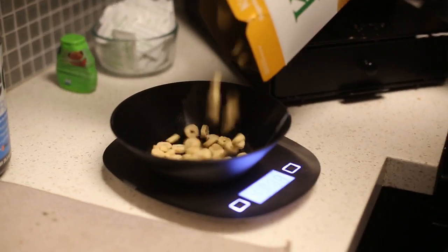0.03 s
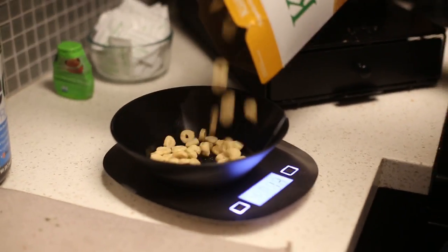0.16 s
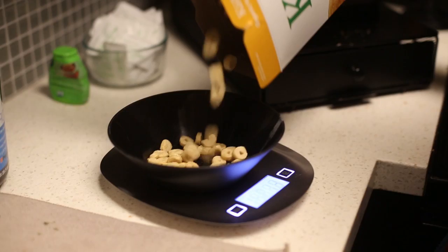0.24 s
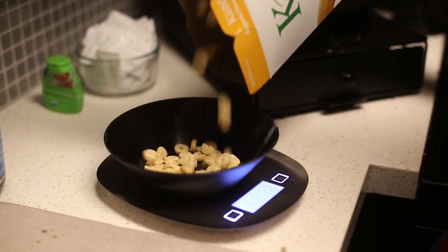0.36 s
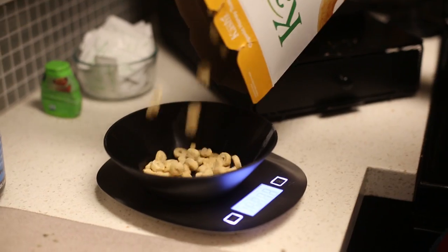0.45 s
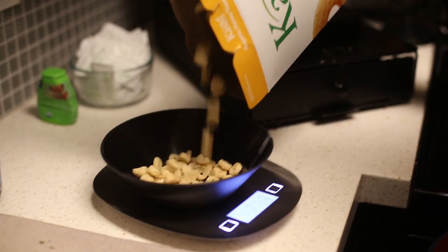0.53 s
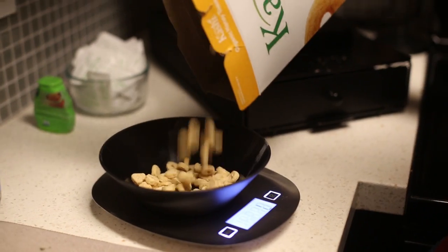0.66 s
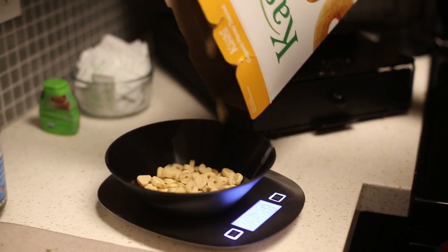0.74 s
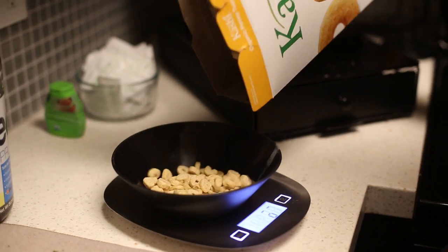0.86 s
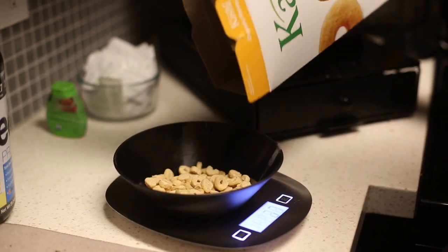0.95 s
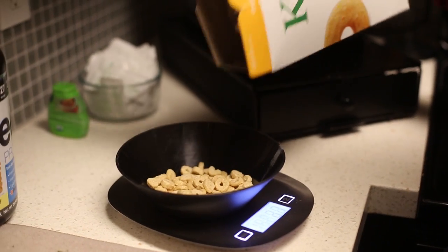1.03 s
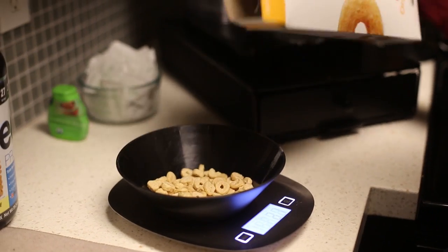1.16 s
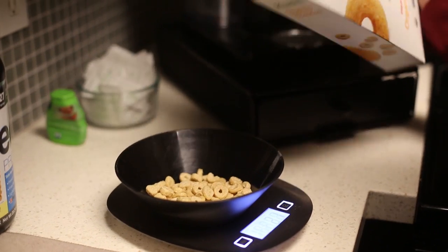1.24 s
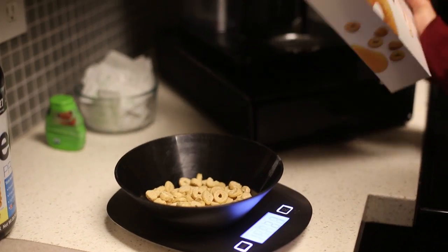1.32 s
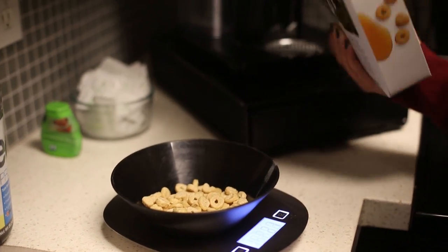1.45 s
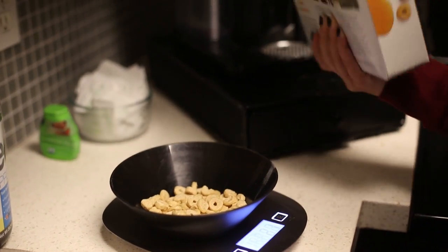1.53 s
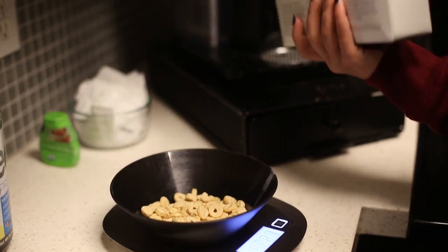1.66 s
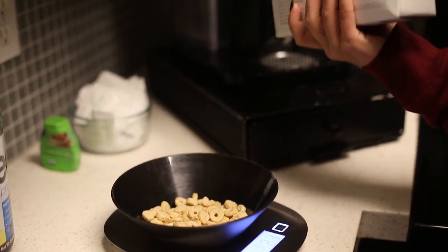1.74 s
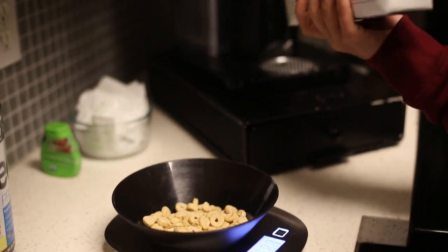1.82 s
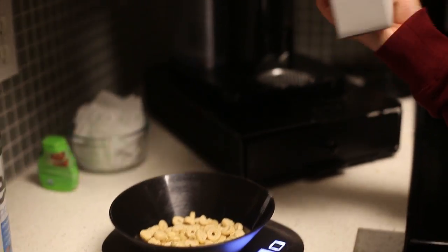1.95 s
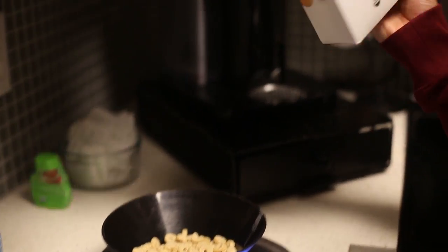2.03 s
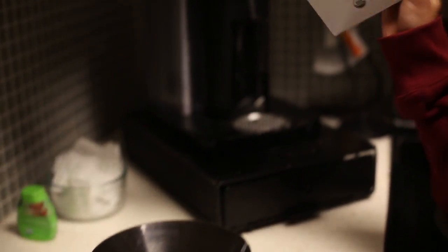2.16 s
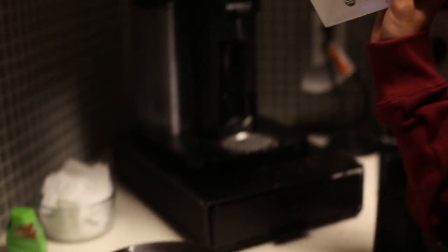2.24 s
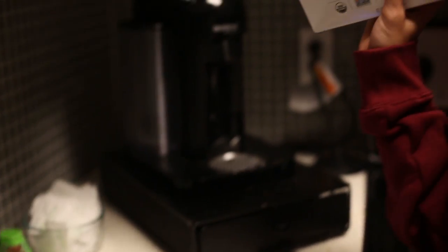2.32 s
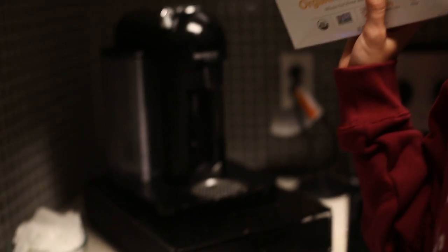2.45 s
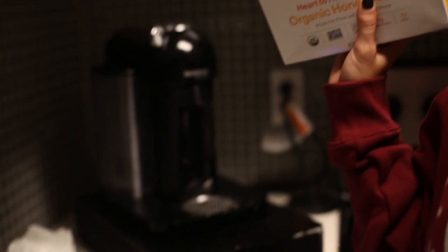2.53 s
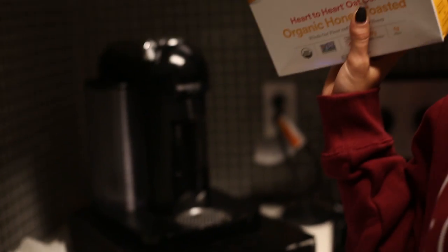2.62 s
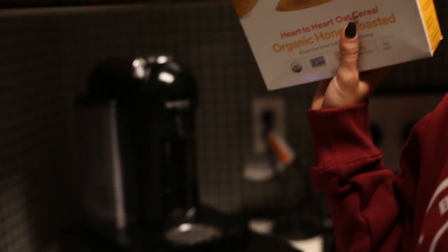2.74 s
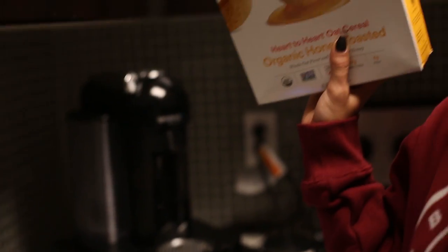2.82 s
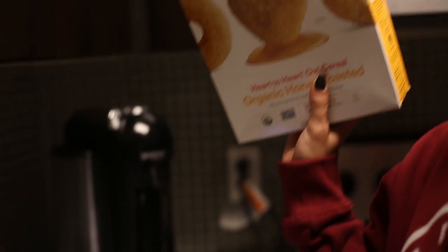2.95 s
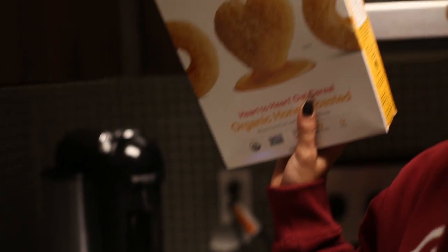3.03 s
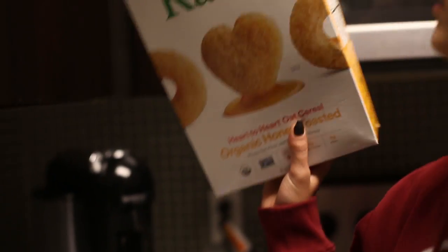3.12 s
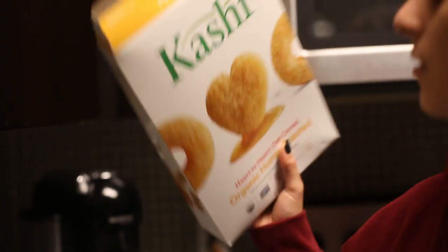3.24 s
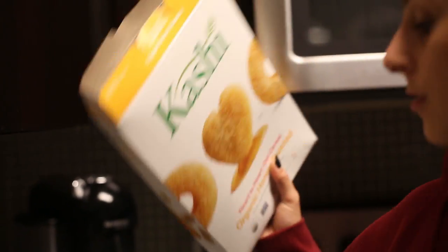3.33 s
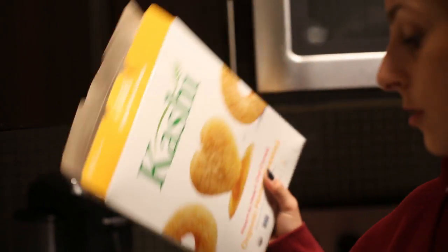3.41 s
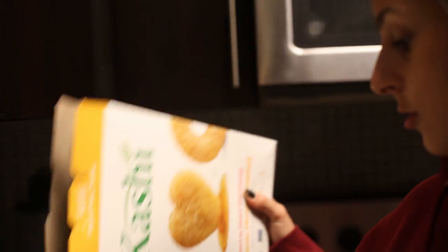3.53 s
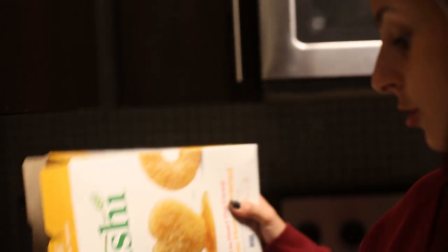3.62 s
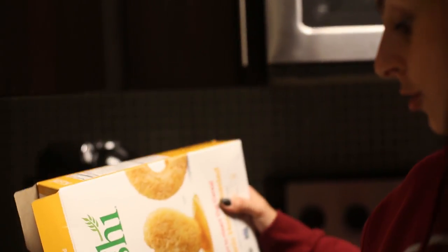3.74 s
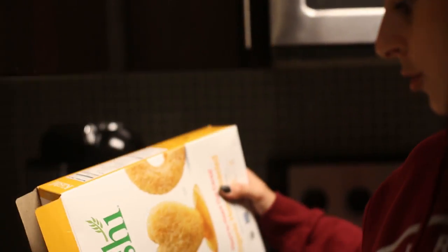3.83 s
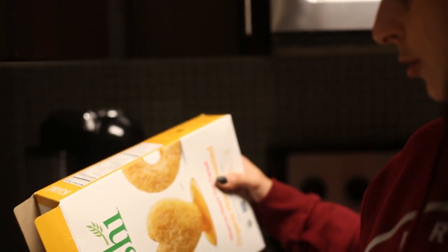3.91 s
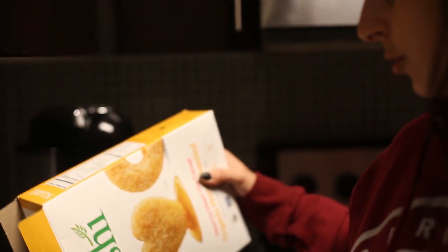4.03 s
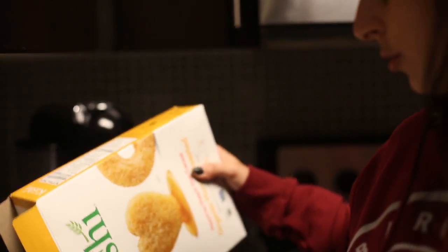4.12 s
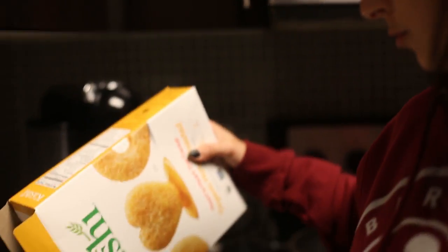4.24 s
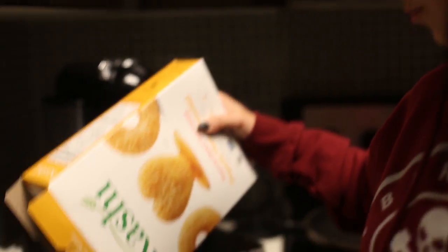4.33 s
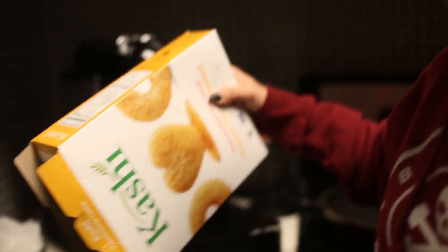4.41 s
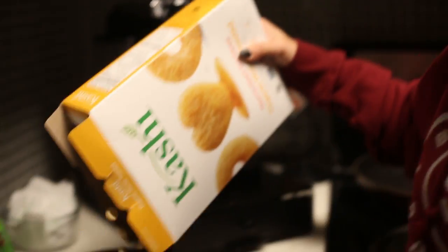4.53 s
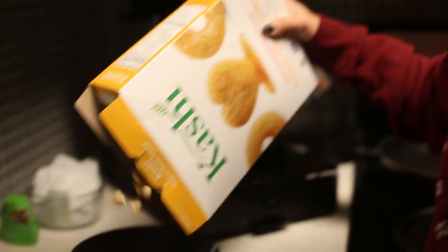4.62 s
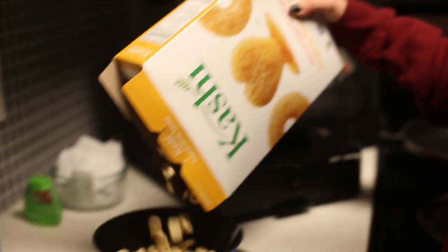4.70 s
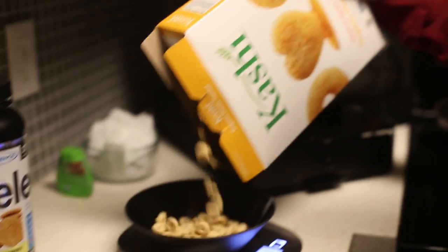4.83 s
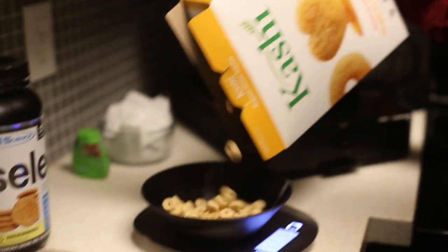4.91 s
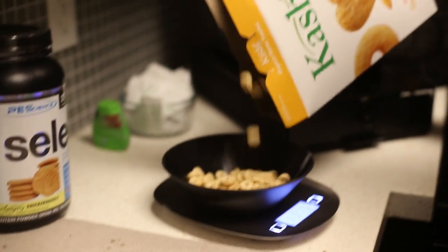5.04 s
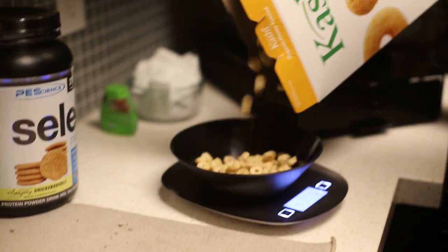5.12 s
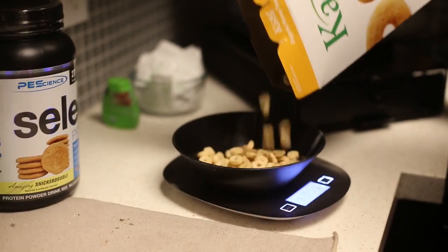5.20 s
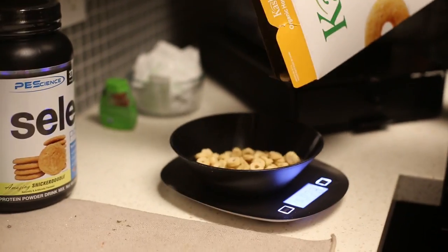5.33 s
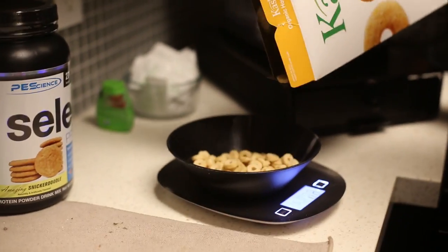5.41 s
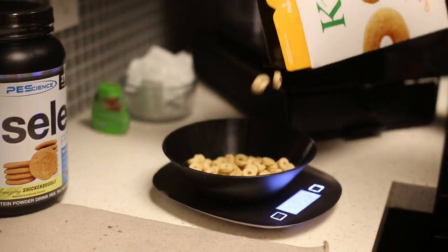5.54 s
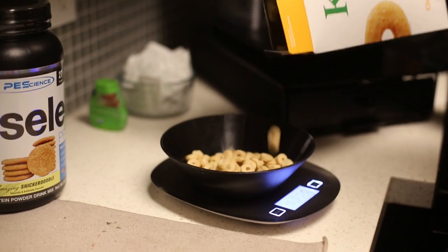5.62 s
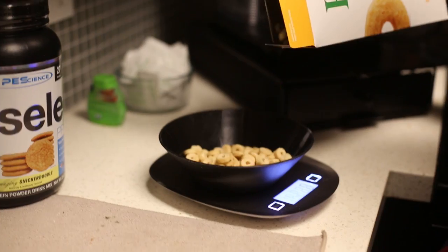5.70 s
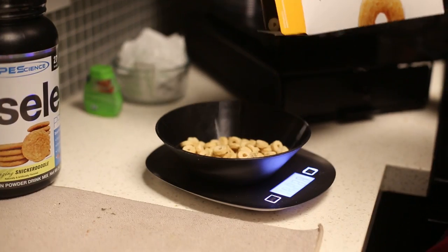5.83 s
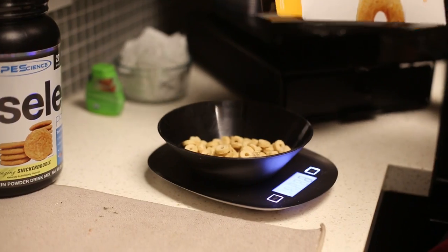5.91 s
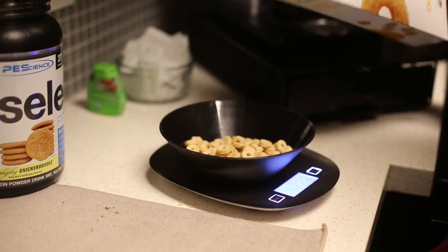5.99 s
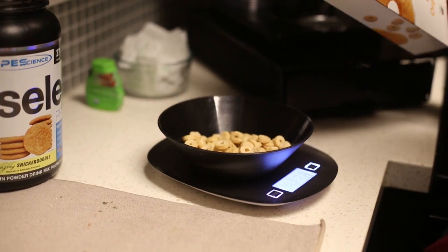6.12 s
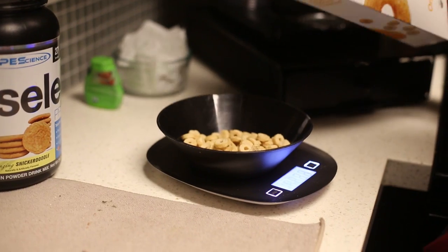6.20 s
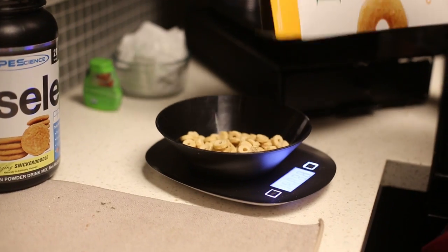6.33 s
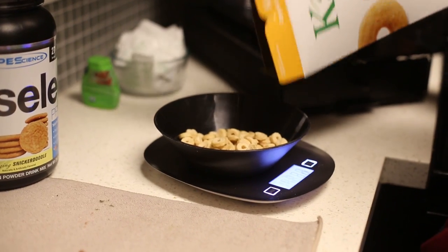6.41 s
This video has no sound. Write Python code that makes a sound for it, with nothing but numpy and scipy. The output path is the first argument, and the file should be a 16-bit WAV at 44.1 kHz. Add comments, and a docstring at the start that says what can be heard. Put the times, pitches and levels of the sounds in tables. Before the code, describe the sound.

Close pickup in a small, slightly live kitchen: a lively patter of hard cereal pieces hits a plastic bowl, then fades. Cereal thumps and shuffles inside the cardboard box, its inner bag rustling. After a quiet gap with one bright tick, another shake and crinkle lead to a sparser, softer pour that dwindles into single taps and box shuffles. A faint appliance hum and room rumble continue underneath.

```python
"""Cereal poured in a kitchen

Dry cereal pours twice from a cardboard box into a plastic bowl on a kitchen counter: ringing modes and clicks.
Between pours it slides and rattles in the tilting box: random grains drum resonant walls and a hollow body.
The liner bag rustles as filtered grains and whistles briefly; a lone bright snap bounces in the quiet.
An appliance hums as wavering tones in the small kitchen, whose walls answer with a decaying noise tail.
The microphone pickup is nearly mono, over room rumble and a soft hiss."""
import sys
import numpy as np
from scipy import signal
from scipy.fft import rfft, irfft, next_fast_len
from scipy.io import wavfile
from scipy.ndimage import uniform_filter1d, map_coordinates

SR = 44100
rng = np.random.default_rng(int(sys.argv[2]) if len(sys.argv) > 2 else 0)


def transcribe(signal):
    """Save signal, clipped to [-1, 1], as a 16-bit WAV file at the path in sys.argv[1]."""
    frames = np.atleast_2d(signal).T
    limited = np.clip(frames, -1, 1)
    pcm = np.round(limited * 32767).astype(np.int16)
    wavfile.write(sys.argv[1], SR, pcm)


def amplitude_ratio(level_db):
    """Convert a level in decibels to the matching linear amplitude (field) ratio."""
    exponent = np.asarray(level_db, float) / 20
    return 10 ** exponent


N = 284886  # samples

# Appliance tones, before they waver: pitch_hz, rms_db
HUM_TONES = [(117.2, -51.5), (228, -67.5), (327, -67), (64, -76)]
# Spectral shape of kitchen rumble and hiss: freq_hz, relative_density_db
AIR_SHAPE = [(12, -49), (30, -12), (60, 3.5), (90, 8), (150, -5.5), (300, -11), (550, -12), (1300, -29),
             (4000, -37.5), (8000, -32), (16000, -31)]
# How fast the room dies away: freq_hz, t60_s
ROOM_DECAY = [(200, 0.62), (1500, 0.53), (3000, 0.4), (3800, 0.47), (4600, 0.41), (12000, 0.15)]

# Thin whistles as the liner bag slips: start_s, length_s, pitch_hz, rms_db
BAG_SQUEAKS = [(3.645, .045, 4900, -64), (3.686, 0.07, 3840, -58), (3.7, .035, 7350, -64)]
# Colour of the rustling grains: freq_hz, relative_gain_db
RUSTLE_SHAPE = [(2060, -52), (3500, 1.5), (3750, -10), (4160, -8), (5530, -7), (11000, -15), (16000, -21)]
# The liner bag rustling: time_s, level_db
LINER_LEVEL = [(0.0, -63), (1.11, -80), (1.39, -64), (1.6, -52), (1.67, -46.5), (1.82, -59), (2.16, -64.5),
               (2.32, -65.5), (2.53, -72.5), (3.15, -75), (3.69, -64), (3.82, -43), (3.94, -55.5),
               (4.19, -62.5), (4.39, -67), (4.57, -69), (5.3, -76), (5.76, -65), (6.12, -82), (6.46, -79)]
# Cereal sliding along the box walls: time_s, level_db
SLIDE_LEVEL = [(0.0, -50), (0.43, -46.5), (0.88, -56.5), (1.1, -67.5), (1.37, -52.5), (1.52, -40),
               (1.65, -31.5), (1.76, -39), (1.97, -52), (2.2, -44.5), (2.43, -66), (3.11, -67.5),
               (3.33, -56.5), (3.52, -60), (3.69, -47), (3.8, -36), (3.92, -42), (4.06, -46.5),
               (4.19, -50.5), (4.3, -52), (4.6, -42.5), (5.11, -53), (5.5, -57.5), (5.78, -45),
               (5.95, -56.5), (6.1, -51), (6.46, -59.5)]
# The box is jolted and its load shifts: peak_s, boom_db, walls_over_boom_db
JOLTS = [(0.0, -37.5, 1.5), (0.161, -43, -3), (0.299, -40.5, -12), (0.609, -47, -4), (0.839, -52.5, -10),
         (1.401, -45.5, -5), (1.53, -47, -17), (2.09, -59, 11.5), (2.21, -52.5, -7), (3.49, -57, -16),
         (3.8, -51.5, -8), (4.08, -56, -7), (4.439, -45, -20), (4.62, -63, -2), (4.679, -48, 7),
         (4.82, -45, 2), (5.202, -46, -10), (5.428, -58, -11), (5.52, -46, 1), (5.589, -47, 7),
         (5.9, -58.5, 15), (6.091, -60, 2)]
# Resonances of the cardboard walls: centre_hz, width_hz, relative_gain_db
WALL_MODES = [(525, 460, -15.5), (661, 121, 0.5), (808, 124, -1), (1040, 300, -1.5), (1524, 510, -6),
              (2500, 510, -11), (3700, 840, -14.5)]
# Resonances of the hollow box body: centre_hz, width_hz, relative_gain_db
BODY_MODES = [(166, 50, -1), (232.7, 27.4, 3), (343.5, 84, -1)]

# Deep modes of the box walls and bowl, rung by a struck piece: pitch_hz, relative_gain_db, t60_s
DEEP_MODES = [(313, 6.5, 0.13), (536, -11, 0.033), (688, -9, 0.035), (747.5, -2.5, 0.061),
              (890, 3.5, 0.023)]
# Low modes rung by a struck piece, on the bowl's rim or the box walls: pitch_hz, relative_gain_db, t60_s
LOW_MODES = [(1104, -15, 0.18), (1120, -28, 0.0584), (1382, -12, 0.11), (1599, 1, 0.027),
             (1747, -0.5, 0.049), (2038, -6, 0.11), (2276, 0.5, 0.042)]
# High modes rung by a struck piece, on the bowl's wall or the box walls: pitch_hz, relative_gain_db, t60_s
HIGH_MODES = [(2560, -1.5, 0.1), (2790, 0, 0.062), (2940, 4.5, 0.029), (3202, -2, 0.061), (3360, -4, 0.082),
              (3593, 8.5, 0.016), (3810, -3, 0.1), (4020, 1.5, 0.03), (4506, -1, 0.089), (4865, 2.5, 0.032),
              (5370, -8, 0.11), (6315, -10.5, 0.057)]
# Colour of a dry piece's click: freq_hz, relative_gain_db
CRACK_SHAPE = [(1000, -16.5), (3000, 8), (5000, 9.5), (7000, 8.5), (11000, 1.5), (15000, -8), (17000, -39)]

# Pieces knocking inside the box: start_s, deep_peak_db, low_over_deep_db, high_over_deep_db, crack_over_deep_db
KNOCKS = [(1.345, -43.5, 5, 1, -18), (1.392, -31, -9, -7, -9), (1.443, -35.5, 1, -5, -14),
          (1.507, -37, 7, 2, -19), (1.524, -37.5, 4, 3, -19), (1.571, -30, -6, -16, -19),
          (1.621, -25.5, -12, -17, -19), (1.651, -27, -2, -6, -24), (1.666, -21, -7, -9, -27),
          (1.685, -26.5, 1, -2, -24), (1.751, -22, -10, -25, -29), (1.813, -28, -13, -0.5, 0.5),
          (1.839, -29.5, -17, -17, -21), (1.882, -35.5, -25, -13, -20), (1.962, -38.5, -17, -4, -5.5),
          (1.99, -40, -11, -2, 9), (2.026, -35, -3, -4, -12), (2.078, -27.5, -12, -26, -35),
          (2.122, -32.5, -3, -8, -29), (2.17, -33.5, -4, -12, -30), (2.209, -35.5, -9, -12, -26),
          (2.253, -37, 2, -0.5, -8), (2.284, -44, 5, 6.5, -25), (2.308, -44, -5, 5, -16),
          (3.341, -39.5, -12, -5, -24), (3.501, -46.5, -3, 8, -2), (3.775, -26.5, -7, -1, -1),
          (3.787, -32.5, 5.5, 0, 2), (3.796, -32, -8, -0.5, 7.5), (3.82, -35, 10, 5.5, -12),
          (3.827, -32, -11, 2, -16), (3.861, -33, -1, 3, 5), (3.894, -51, -12, -12, -12),
          (3.991, -48, -5, -14, -17), (4.101, -37, -2, -15, -26), (4.149, -43, 4, 3, 4),
          (4.157, -42, -5, 11.5, 12.5), (4.285, -43.5, 1, 2, -20), (4.362, -45, 12, 5, -18),
          (4.432, -56, -10, -3, -17), (4.45, -56, 2, -12, -22), (4.655, -32, 0, -10, -18),
          (5.142, -38.5, 3, -6, -11), (5.183, -32.5, 1, 3, -16), (5.514, -40.5, -7, -11, -28),
          (5.663, -37.5, 3, -10, -24), (5.694, -48, 13, -2, -17), (5.716, -36, 12, -4, -21),
          (5.773, -38, 6, -2, -12), (5.914, -56, 10, -3, -17), (6.003, -49, 6, -6, -23),
          (6.054, -42, 7, -9, -22), (6.091, -37.5, 3.5, -22, -30), (6.114, -43, 6, -12, -22)]
# A lone snap and its bounce: start_s, ring_hz, high_peak_db, low_peak_db, crack_peak_db, deep_peak_db
SNAP_HITS = [(2.7605, 3700, -19, -29.5, -34, -53.5), (2.7666, 3500, -35.5, -39, -37, -53)]
# Small pieces pattering into the bowl: time_s, level_db
POUR_LEVEL = [(0.0, -40), (0.43, -36.5), (0.66, -35), (0.86, -41), (1.02, -45.5), (1.11, -81),
              (4.39, -79.5), (4.57, -49.5), (4.71, -43.5), (4.89, -35.5), (5.09, -46.5), (5.22, -47),
              (5.4, -48), (5.56, -69), (5.88, -68), (6.12, -81), (6.46, -72)]
# Pieces landing in the bowl: start_s, ring_hz, high_peak_db, low_peak_db, crack_peak_db
LANDINGS = [(0.0008, 2790, -8.5, -15, -19.5), (0.007, 2860, -19, -19.5, -13.5),
            (0.0495, 3220, -11, -16.5, -14.5), (0.0897, 2800, -31, -22, -46), (0.0961, 3540, -10, -9, -10),
            (0.1012, 3000, -15, -29, -37), (0.1157, 2840, -15, -40, -26), (0.1272, 2860, -21, -16, -21),
            (0.1327, 3250, -18, -22, -17), (0.1378, 3460, -10, -16.5, -8.5), (0.1563, 2850, -16, -22, -18),
            (0.1672, 3340, -26, -17, -12.5), (0.1728, 3220, -7.5, -11.5, -24),
            (0.1878, 3430, -28, -25, -22), (0.213, 3610, -22, -22, -23), (0.2357, 3070, -23, -11, -5),
            (0.2437, 3110, -11, -39, -31), (0.2867, 3730, -17, -20.5, -26), (0.2924, 3050, -15, -28, -26),
            (0.303, 2900, -15, -18, -21), (0.3197, 3510, -24, -29, -23), (0.328, 3400, -8.5, -20, -13.5),
            (0.3676, 3360, -8, -9, -18.5), (0.4102, 3550, -34, -32, -30), (0.425, 3240, -15, -38, -15.5),
            (0.4364, 2830, -21, -30, -33), (0.441, 3070, -15.5, -23, -15.5), (0.471, 3350, -22, -32, -18.5),
            (0.4858, 3350, -8, -22.5, -16), (0.5075, 3600, -23, -29, -28), (0.5378, 2820, -18, -28, -23),
            (0.557, 3200, -13.5, -23.5, -18.5), (0.5963, 3310, -20, -31, -29),
            (0.6025, 3400, -15, -22, -9.5), (0.6079, 3300, -17, -43, -27),
            (0.632, 3290, -17.5, -19.5, -18.5), (0.664, 3370, -23, -38, -33),
            (0.6704, 3200, -13, -21.5, -21), (0.6822, 3150, -13.5, -38, -30), (0.7136, 3250, -19, -21, -29),
            (0.731, 3710, -17, -31, -25.5), (0.749, 2790, -18, -27, -35), (0.754, 2940, -30, -25, -18.5),
            (0.779, 3060, -30, -37, -51), (0.79, 3000, -16, -20, -19), (0.7974, 3220, -9.5, -17, -12),
            (0.8094, 3050, -25, -20.5, -25), (0.8732, 3780, -36, -35, -20),
            (0.905, 3020, -17.5, -29.5, -27), (0.9298, 3420, -25, -44, -40),
            (0.9411, 3130, -30, -51, -23.5), (0.9525, 3280, -21, -29, -46), (0.98, 3100, -37, -45, -49),
            (1.0006, 3560, -26, -39, -33.5), (1.0497, 3000, -32, -38.5, -43),
            (1.1175, 3480, -38.5, -45, -53), (1.1405, 3320, -44, -50.5, -59),
            (4.533, 3100, -21, -29.5, -27.5), (4.5513, 3660, -25, -27, -33), (4.5755, 2810, -46, -35, -32),
            (4.587, 3550, -19.5, -25, -20), (4.6271, 3030, -35, -35, -34), (4.6757, 3100, -34, -35, -31.5),
            (4.6952, 3380, -32, -25.5, -42), (4.7171, 3260, -27, -29, -29), (4.7608, 3450, -30, -38, -25.5),
            (4.767, 2900, -29, -43, -30), (4.8142, 2950, -11, -18, -21.5), (4.8216, 4430, -17, -30, -24),
            (4.8443, 3320, -25, -35, -27), (4.8524, 3600, -27, -37, -22), (4.8877, 2910, -16.5, -35, -39),
            (4.8942, 3130, -17, -30, -17), (4.9182, 2670, -22.5, -28, -32), (4.923, 3090, -27, -30, -27),
            (4.9445, 3390, -34, -38, -31), (4.9705, 3390, -28, -45, -31), (4.9766, 2690, -25.5, -31, -34),
            (4.9887, 3030, -28, -44, -40), (5.0067, 2990, -19.5, -30, -24), (5.0127, 2660, -30, -31, -41),
            (5.0277, 3070, -34, -49, -30), (5.0428, 2660, -26.5, -34, -45), (5.068, 3000, -27, -46, -28),
            (5.0867, 4600, -27.5, -32, -30), (5.137, 3810, -35, -41, -39), (5.1772, 2880, -34, -28.5, -32),
            (5.2281, 2560, -31, -19.5, -24.5), (5.234, 3700, -22.5, -33, -27),
            (5.274, 2790, -29, -24, -31.5), (5.2807, 2980, -26, -24.5, -39), (5.2992, 3120, -23, -41, -27),
            (5.3286, 3440, -19, -26, -29), (5.3358, 3430, -24.5, -30.5, -24.5),
            (5.3525, 2860, -27.5, -30, -38), (5.366, 2970, -32, -39, -31), (5.375, 3000, -28.5, -41, -38),
            (5.412, 3360, -35, -44, -48), (5.4305, 3560, -34, -39, -42), (5.4575, 2950, -17.5, -36, -23),
            (5.5665, 3480, -34, -60, -48), (5.582, 2700, -25, -22, -33.5), (5.597, 3340, -30, -39, -33),
            (5.645, 3200, -24.5, -24, -31.5), (5.742, 3780, -25, -25, -23), (5.7603, 4230, -14, -31, -29),
            (5.7672, 3730, -45, -35, -34), (5.791, 2860, -30, -29, -32), (5.8056, 3660, -29, -27, -35),
            (5.8172, 4020, -33, -28, -42), (5.8418, 3300, -36, -36, -38), (5.864, 3300, -34, -26.5, -50),
            (5.8836, 3120, -31, -25.5, -34), (5.9105, 3000, -51, -30.5, -59), (5.9313, 3100, -52, -37, -59),
            (6.0223, 2680, -41, -37, -55), (6.1592, 2590, -53, -37.5, -63), (6.3122, 2840, -29, -30, -45),
            (6.348, 2800, -60, -42, -56)]


def unit(x):
    """Scale to rms 1."""
    return x / np.sqrt(np.mean(x ** 2) + 1e-20)


def peaked(waves):
    """Scale each row to peak 1."""
    return waves / np.abs(waves).max(axis=1, keepdims=True)


def along(points, hz):
    """Read (frequency, value) points on a log frequency axis."""
    f, value = np.transpose(points)
    return np.interp(np.log(hz + 1), np.log(f + 1), value)


def curves(rows):
    """One value per sample for each column after the time."""
    s, *columns = np.transpose(rows)
    return [np.interp(np.arange(N) / SR, s, column) for column in columns]


def filtered(x, response):
    """Multiply the spectrum of x by a complex response of frequency."""
    size = next_fast_len(x.shape[-1] + 8192)
    spectrum = rfft(x, size) * response(np.fft.rfftfreq(size, 1 / SR))
    return irfft(spectrum, size)[..., :x.shape[-1]]


def resonant(x, modes):
    """Pass x through parallel broad resonances of alternating sign."""
    def response(f):
        total = 0
        for k, (centre, width, db) in enumerate(modes):
            damping = 1j * f * width
            total = total + (-1) ** k * amplitude_ratio(db) * damping / (centre * centre - f * f + damping)
        return total
    return filtered(x, response)


def wobble(rate):
    """A smooth random curve with rate knots a second, up to 40."""
    knots = rng.standard_normal(int(N * 40 / SR) + 4)
    return map_coordinates(knots, [np.arange(N) * rate / SR])


def placed(times, waves):
    """Sum rows of short waves at their start times."""
    start = np.round(np.asarray(times) * SR).astype(int)
    at = start[:, None] + np.arange(waves.shape[1])
    return np.bincount(at.ravel(), waves.ravel(), N + SR)[:N]


def grains(rate, spread_db):
    """Random impulses at rate a second, scaled to rms 1, some larger than the rest."""
    draw = rng.random((3, N))
    size = amplitude_ratio(-spread_db * np.log(draw[1] + 0.045))
    return unit((draw[0] < rate / SR) * size * np.sign(draw[2] - 0.5))


def clacks(modes, ring_hz, focus, scatter_db, rough):
    """One peak-1 ring per row: modes lose focus dB per octave from ring_hz; loose pieces roughen them."""
    hz, db, t60 = np.transpose(modes)
    t = np.arange(2048) / SR
    chance = rng.standard_normal((len(ring_hz), 2, len(hz)))
    distance = np.abs(np.log2(hz / ring_hz[:, None]))
    gain = amplitude_ratio(db - focus * distance + scatter_db * chance[:, 0])
    phase = np.pi * chance[:, 1]
    fade = amplitude_ratio(-60 * t / t60[:, None]) * (1 - np.exp(-t * hz[:, None] / 1.23))
    # the blow lasts a few ms, longer for deep modes; a weaker ring follows
    fade = fade * (0.73 + np.exp(-(t * hz[:, None] ** 0.715 / 1.5) ** 2))
    turn = 2 * np.pi * hz[:, None] * t
    ring = (gain * np.cos(phase)) @ (fade * np.sin(turn))
    ring += (gain * np.sin(phase)) @ (fade * np.cos(turn))
    chatter = uniform_filter1d(rng.standard_normal(ring.shape), size=70, axis=1)
    chatter = unit(uniform_filter1d(chatter, size=70, axis=1))
    return peaked(ring * (1 + rough * chatter))


def clicks(count):
    """Brittle noise bursts: a fast crack with a weaker tail, each brighter or duller."""
    t = np.arange(1024) / SR
    rise = 1 - np.exp(-t / 0.00013)
    fall = amplitude_ratio(-60 * t / 0.0026) + 0.18 * amplitude_ratio(-60 * t / 0.065)
    burst = rng.standard_normal((count, len(t))) * rise * fall
    tilt_db = 4.4 * rng.standard_normal((count, 1))  # per octave, between 4 and 16 kHz

    def colour(f):
        octave = np.log2(np.clip(f, 4000, 16000) / 9000)
        return amplitude_ratio(along(CRACK_SHAPE, f) + tilt_db * octave)
    return peaked(filtered(burst, colour))


def hits(s, hz, high_db, low_db, crack_db, deep_db, low_hz, deep_hz, focus):
    """Distinct pieces: each sounds a high, a low and a deep ring and a brittle click."""
    click = clicks(len(s))
    high = clacks(HIGH_MODES, hz, focus=focus, scatter_db=1.5, rough=0.58)
    each_low_hz = low_hz * 2 ** (0.1 * rng.standard_normal(len(s)))
    low = clacks(LOW_MODES, each_low_hz, focus=14, scatter_db=7.5, rough=0.7)
    deep = clacks(DEEP_MODES, deep_hz + 0 * s, focus=33, scatter_db=6, rough=0.42)
    ring = amplitude_ratio(high_db)[:, None] * high + amplitude_ratio(low_db)[:, None] * low + amplitude_ratio(deep_db)[:, None] * deep
    return placed(s, ring) + placed(s, amplitude_ratio(crack_db)[:, None] * click)


def patter(low_hz, octaves):
    """Many small bounces and rolls, each ringing somewhere in the octaves above low_hz; rms 1."""
    draw = rng.random((1000, 3))
    ring_hz = low_hz * 2 ** (octaves * draw[:, 1])
    waves = clacks(LOW_MODES + HIGH_MODES, ring_hz, focus=7.8, scatter_db=4.5, rough=0.53)
    size = amplitude_ratio(-3 * np.log(draw[:, 2:] + 0.06))
    return unit(placed(draw[:, 0] * N / SR, size * waves))


def air():
    """Steady room rumble and hiss: noise shaped in frequency, at -54 dB rms."""
    noise = rng.standard_normal(N)
    return amplitude_ratio(-54) * unit(filtered(noise, lambda f: amplitude_ratio(along(AIR_SHAPE, f))))


def hum():
    """Appliance tones that waver in strength and phase."""
    t = np.arange(N) / SR
    total = np.zeros(N)
    for hz, db in HUM_TONES:
        level = np.sqrt(2) * amplitude_ratio(db + 2.0 * wobble(4.5))
        total += level * np.sin(2 * np.pi * hz * t + 1.0 * wobble(5.6))
    return total


def kitchen(x):
    """The walls answer about 3 ms later; each frequency dies at its own speed."""
    hz, t, z = signal.stft(rng.standard_normal(SR // 2), SR, nperseg=256)
    decay = amplitude_ratio(-60 * t / along(ROOM_DECAY, hz)[:, None])
    tail = signal.istft(z * decay, SR, nperseg=256)[1]
    late = np.pad(x, (130, 0))
    return signal.fftconvolve(late, tail / np.linalg.norm(tail))[:N]


def squeaks():
    """The slipping liner bag whistles: short unsteady tones that swell and fade."""
    t = np.arange(N) / SR
    total = np.zeros(N)
    for s, length, hz, db in BAG_SQUEAKS:
        swell = np.sin(np.pi * np.clip((t - s) / length, 0, 1))
        total += 2 * amplitude_ratio(db) * swell * np.sin(2 * np.pi * hz * t + 1.7 * wobble(40))
    return total


def rustle(pour_db, liner_db):
    """Dry pieces and the liner bag tick: filtered grains follow the pour and the bag."""
    ticks = filtered(grains(2100, spread_db=2.5), lambda f: amplitude_ratio(along(RUSTLE_SHAPE, f)))
    level = amplitude_ratio(pour_db - 12) + amplitude_ratio(liner_db)
    return level * unit(amplitude_ratio(0.7 * wobble(29)) * ticks)


def cardboard(x, wall, body):
    """Blows on the box sound its walls and its hollow body."""
    once = resonant(x, WALL_MODES)
    walls = unit(once + 0.29 * resonant(once, WALL_MODES))
    return wall * walls + body * unit(resonant(x, BODY_MODES))


def slide(slide_db):
    """Cereal tumbling in clumps drums the box, harder at each jolt."""
    rise_s, fall_s = 0.0081, 0.018
    s, boom_db, wall_db = np.transpose(JOLTS)[:, :, None]
    t = np.arange(N) / SR - s
    swell = np.exp(-(t / np.where(t < 0, rise_s, fall_s)) ** 2)
    wall = amplitude_ratio(slide_db + 1.09 * wobble(14)) + (amplitude_ratio(boom_db + wall_db) * swell).sum(axis=0)
    # the hollow body grows 0.69 dB per dB of sliding
    body_db = -52.5 + 0.69 * (slide_db + 48)
    body = amplitude_ratio(body_db + 2.6 * wobble(10)) + (amplitude_ratio(boom_db) * swell).sum(axis=0)
    clumps = amplitude_ratio(1.1 * wobble(30)) * grains(800, spread_db=1.5)
    return cardboard(clumps, wall, body)


def loose_pieces(slide_db):
    """Pieces bouncing in the box: patter that grows dB for dB with the sliding."""
    return amplitude_ratio(slide_db - 11) * patter(low_hz=1120, octaves=1.74)


def knocks():
    """Pieces on cardboard: rings and clicks, duller than on the bowl."""
    s, deep_db, low_db, high_db, crack_db = np.transpose(KNOCKS)
    hz = 3350 * 2 ** (0.18 * rng.standard_normal(len(s)))
    return hits(s, hz, deep_db + high_db, deep_db + low_db, deep_db + crack_db, deep_db,
                low_hz=1330, deep_hz=598, focus=9.1)


def snap():
    """A lone bright snap and its bounce, with the high ring tightly focused."""
    return hits(*np.transpose(SNAP_HITS), low_hz=1170, deep_hz=880, focus=38)


def pouring(pour_db):
    """Small pieces pattering into the bowl: many overlapping rings."""
    return amplitude_ratio(pour_db) * patter(low_hz=1640, octaves=1.4)


def landings():
    """Pieces on the bowl: bright, with a weak deep ring that grows with the low one."""
    s, hz, high_db, low_db, crack_db = np.transpose(LANDINGS)
    # the deep ring grows 0.65 dB per dB of low ring and scatters by 6.5 dB
    deep_db = -45.5 + 0.65 * (low_db + 26.5) + 6.5 * rng.standard_normal(len(s))
    return hits(s, hz, high_db, low_db, crack_db, deep_db, low_hz=1740, deep_hz=784, focus=16.7)


def scene():
    """The pour, the box and the room, all in the centre."""
    (pour_db,), (slide_db,), (liner_db,) = curves(POUR_LEVEL), curves(SLIDE_LEVEL), curves(LINER_LEVEL)
    box = squeaks() + rustle(pour_db, liner_db) + slide(slide_db) + loose_pieces(slide_db) + knocks()
    near = box + snap() + pouring(pour_db) + landings()
    mid = near + amplitude_ratio(-14.5) * kitchen(near) + hum() + air()
    return np.array([mid, mid])


def roll_off(x):
    """The treble ends steeply here."""
    return signal.sosfilt(signal.butter(12, 16990, fs=SR, output="sos"), x)


def record(dry):
    """Near-mono: faint opposite hiss and a little treble that follows the sound; nothing above 15850 Hz."""
    hiss = amplitude_ratio(-68.5) * rng.standard_normal(N)
    side = hiss + filtered(dry[0], lambda f: 0.08j * (f / 12000) ** 3)
    mix = filtered(dry + [side, -side], lambda f: f < 15850)
    return roll_off(mix)


dry = scene()
out = record(dry)
transcribe(out)
```